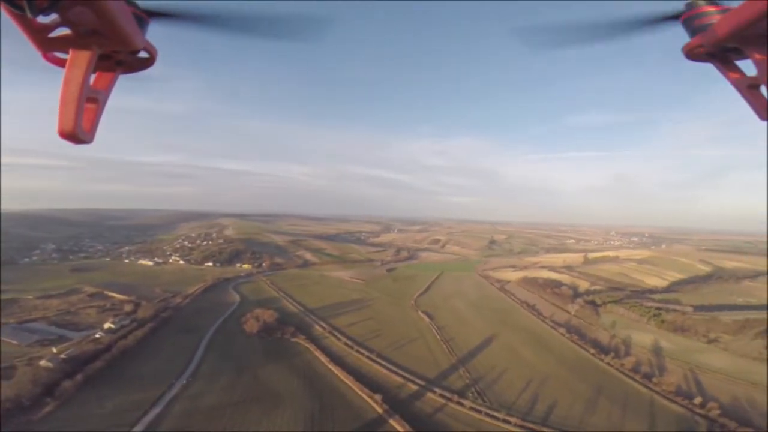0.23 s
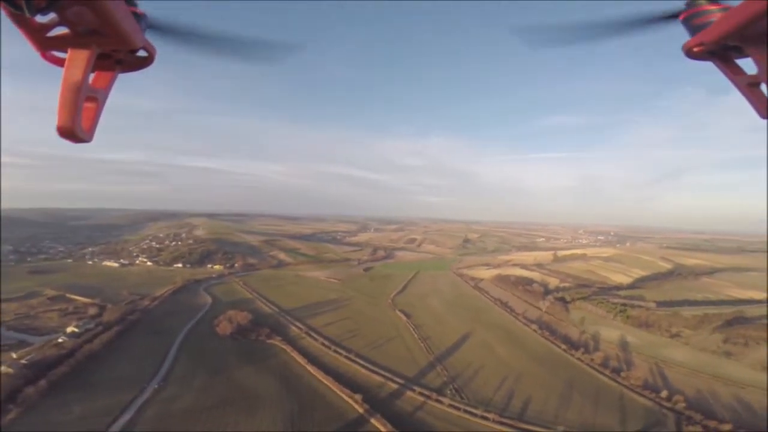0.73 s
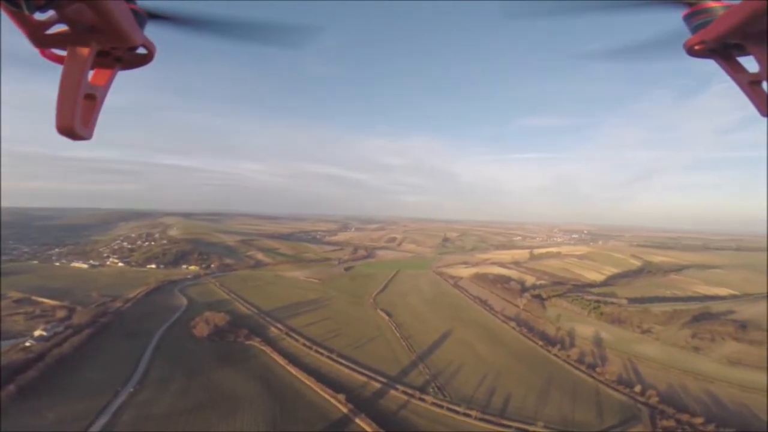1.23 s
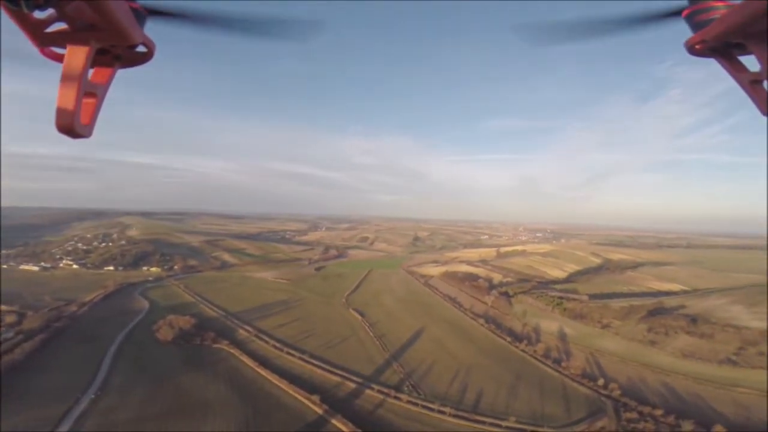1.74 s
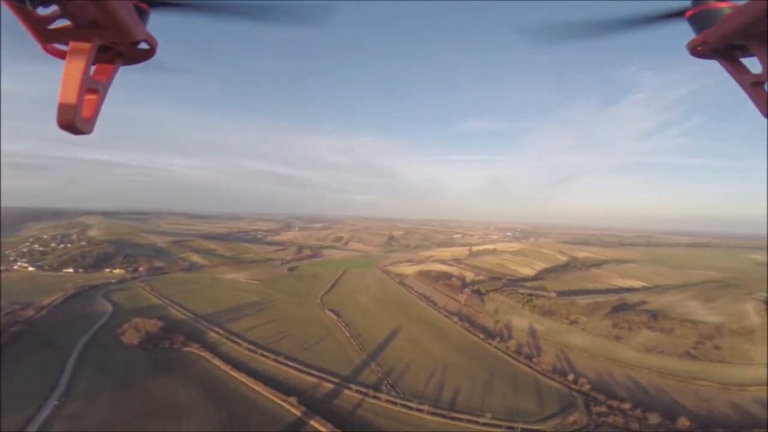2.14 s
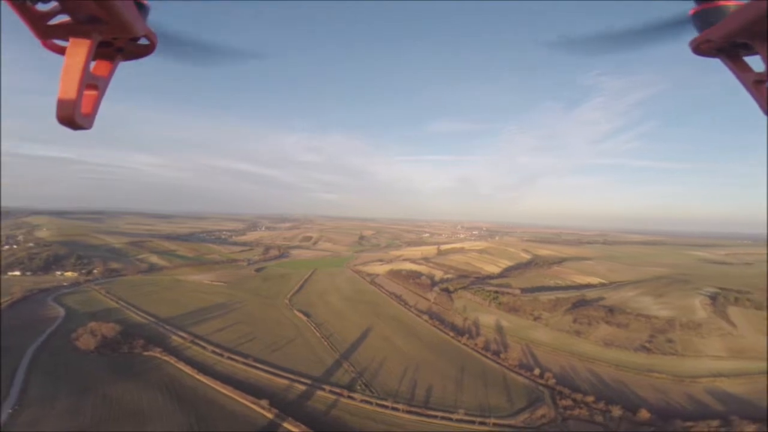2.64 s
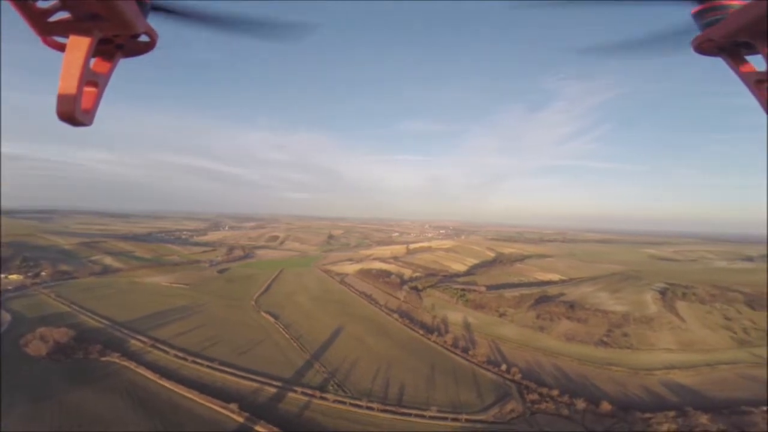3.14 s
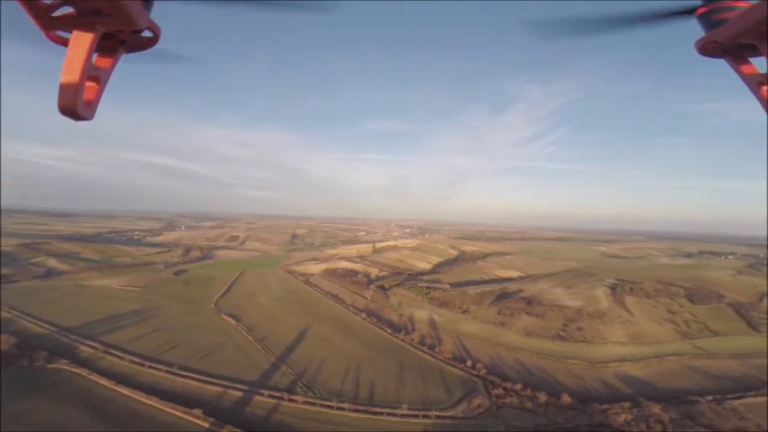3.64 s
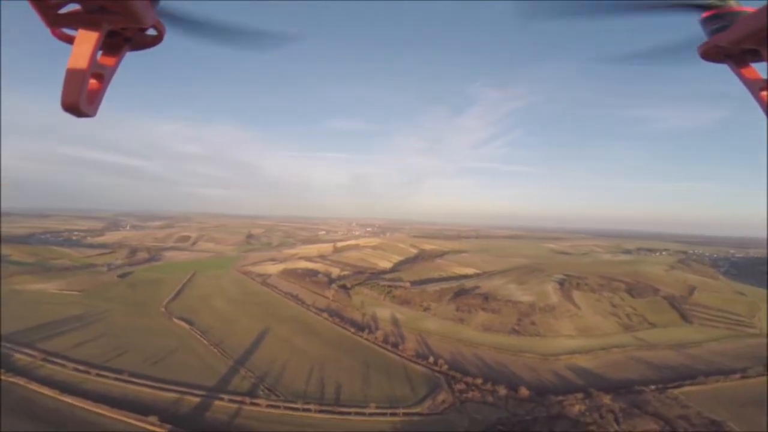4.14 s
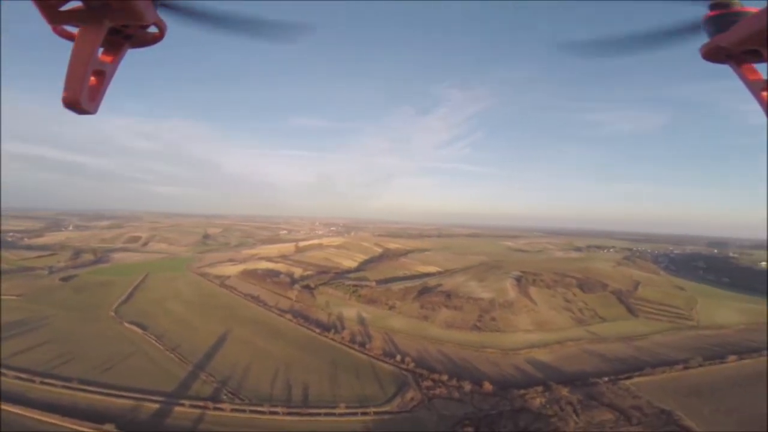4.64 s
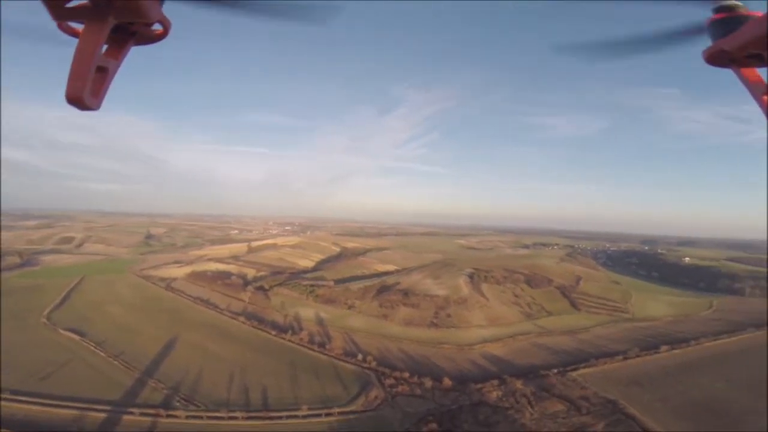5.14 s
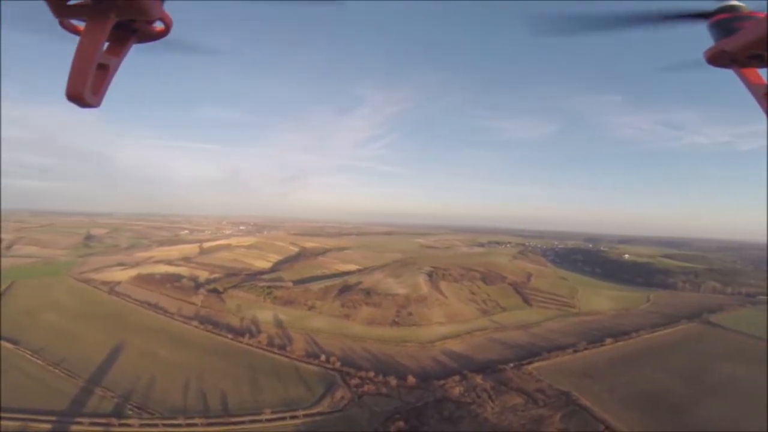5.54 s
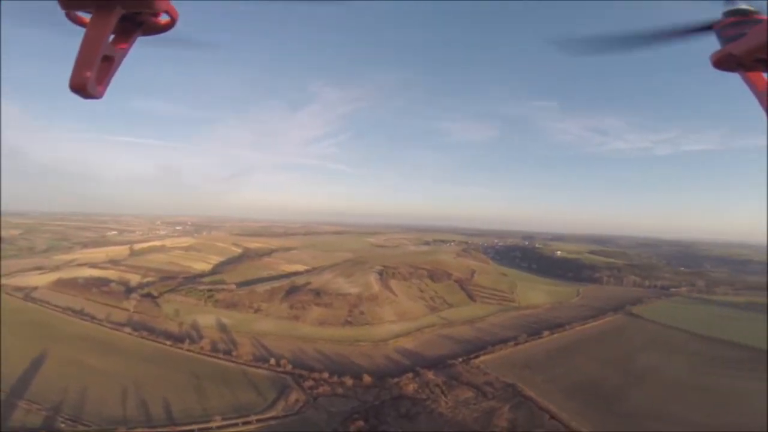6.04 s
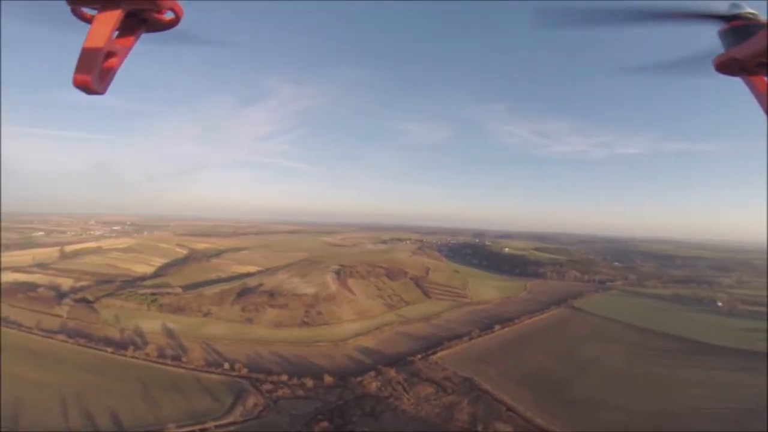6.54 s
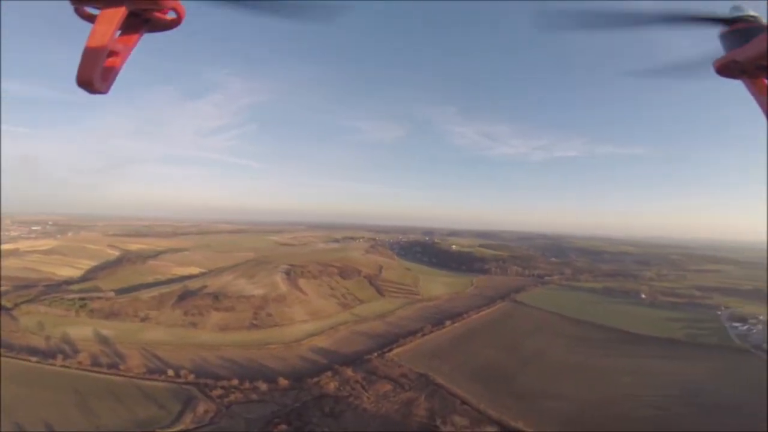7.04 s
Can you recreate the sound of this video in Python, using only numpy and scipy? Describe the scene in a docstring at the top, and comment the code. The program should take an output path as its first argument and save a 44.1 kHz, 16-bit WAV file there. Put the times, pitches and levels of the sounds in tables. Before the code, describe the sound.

Outdoors in the air, a drone buzzes continuously, very close and dry. Its deep propeller hum wavers as motor speeds shift, with metallic whines and a shrill, slowly beating electronic whistle overhead. Low gusts buffet the microphone early, strongest before three seconds. Afterwards a coarse, ragged chopping of air grows, peaks shortly before six seconds, then softens slightly.

```python
"""A six-rotor drone in flight, heard by a microphone on its frame: the two nearest propellers sound harmonics of
their blade-pass rates, which beat together, and their brushless motors add pole tones and switching sidebands.
Six speed controllers whistle as sines near 8 kHz, two of them about 2 Hz apart and beating; a farther motor
whines thinly. Both propellers chop turbulent air, made as random snaps at the passing blades; shaped noise gives
wind rumble and flutter, and a hiss that throbs at the fast blade-pass rate. The level dips briefly now and then."""
import sys
import numpy as np
from scipy import signal
from scipy.fft import rfft, irfft, next_fast_len
from scipy.io import wavfile

SR = 44100
rng = np.random.default_rng(int(sys.argv[2]) if len(sys.argv) > 2 else 0)


def transcribe(u):
    """Save the signal u as a 16-bit wav file named by the first command-line argument.

    u: samples, shape (n,) or (channels, n), limited to [-1, 1]; the rate is SR.
    q: integer samples, one column per channel.
    """
    v = np.clip(np.atleast_2d(u).T, -1, 1)
    q = np.round(v * 32767).astype(np.int16)
    wavfile.write(sys.argv[1], SR, q)


N = 321048

# Speed controllers; the first two drive the fast and the slow rotor.
# Each row: switching rate in Hz, level in dB relative to the common whistle level.
SWITCHING = [(8020.05, -10), (8049.62, -3), (8063.5, -19), (8082.8, -9), (8093.34, -18)]


def from_db(db):
    """Amplitude ratio of a level: 20 dB for each factor of ten."""
    return 10 ** (np.asarray(db) / 20)


def rms_one(x):
    """Normalisation of the root mean square to 1."""
    return x / np.sqrt(np.mean(x ** 2) + 1e-20)


def in_time(rows):
    """Linear interpolation of each column of a curve table, sample by sample."""
    seconds, *columns = np.transpose(rows)
    return [np.interp(np.arange(N) / SR, seconds, column) for column in columns]


def drift(rate_hz):
    """Slow random fluctuation of rms 1: white noise through a two-pole low-pass at rate_hz."""
    step, settling = 20, 4000   # samples per slow value, slow values discarded
    pole = np.exp(-2 * np.pi * rate_hz * step / SR)
    noise = rng.standard_normal(N // step + settling + 2)
    slow = signal.lfilter([1], [1, -2 * pole, pole * pole], noise)[settling:]
    return np.interp(np.arange(N) / step, np.arange(len(slow)), rms_one(slow))


def coloured(x, spectrum):
    """Spectral shaping: x filtered by a curve of dB against log frequency, then set to rms 1."""
    hz, db = np.transpose(spectrum)
    size = next_fast_len(N)
    log_hz = np.log(np.arange(1, size // 2 + 2) * SR / size)
    gain = from_db(np.interp(log_hz, np.log(hz), db, left=-60, right=-90))
    return rms_one(irfft(rfft(x, size) * gain, size)[:N])


def tone(angle, db):
    """A sine whose rms level is db: its peak is the square root of 2 times its rms."""
    return np.sqrt(2) * from_db(db) * np.sin(angle)


def shaft(turns, wobble):
    """Rotation: the angle is the integral of speed, here with the controller's small corrections (turns per s)."""
    turns = turns + wobble * drift(16.0)
    return turns, 2 * np.pi * np.cumsum(turns) / SR


def rotor(turns, angle, blade_db, octave_db, whine_db, orders, sidebands, switch_hz, arm):
    """Periodic blade loading gives shaft harmonics; switching mixed with the turning magnets gives sidebands."""
    blade_pass = tone(2 * angle, blade_db + 0.21 * drift(13.0))   # two blades
    out = blade_pass + tone(4 * angle, octave_db + 0.34 * drift(18.0))
    load_db = .5 * (octave_db - np.mean(octave_db))   # blade overtones grow with blade load
    arm_hz, width_hz, lift_db = arm
    switching = 2 * np.pi * switch_hz * np.arange(N) / SR
    waver_db = [0.93 * drift(2.3) for _ in range(4)]
    tones = [(0, k, db) for k, db in orders] + sidebands
    for i, (m, k, db) in enumerate(tones):
        # The arm resonance lifts tones that cross it.
        detuning = (m * switch_hz + k * turns - arm_hz) / width_hz
        arm_gain_db = lift_db / (1 + detuning ** 2)
        drive_db = load_db if m == 0 and k <= 16 else whine_db
        level_db = db + arm_gain_db + waver_db[i % 4] + drive_db
        out += tone(m * (switching + i) + k * angle, level_db)
    return out


def controllers():
    """Beating: of six whistles between 8020 and 8094 Hz, the closest two, about 2 Hz apart, beat slowly."""
    # Each row: time in seconds, common whistle level in dB.
    whistle = [(0, -25), (1.2, -25.5), (2.5, -24.5), (5, -27), (6.2, -27.5), (7.28, -28)]
    # A third controller's clock stays just below the slow rotor's, so that the two beat.
    # Each row: time in seconds, distance below in Hz.
    creep = [(0, 1.84), (1.2, 1.78), (2.5, 1.64), (3.5, 1.72), (4, 2.04), (5, 2.06), (5.8, 2.33),
             (6.6, 2.08), (7.28, 2.12)]
    creep_share_db = -4.5
    in_step_s = .45   # the beating pair is about in step here
    level_db, = in_time(whistle)
    below_hz, = in_time(creep)
    t = np.arange(N) / SR - in_step_s
    lag = np.cumsum(below_hz) / SR - below_hz[0] * in_step_s
    cycles = [hz * t for hz, _ in SWITCHING] + [SWITCHING[1][0] * t - lag]
    shares_db = [db for _, db in SWITCHING] + [creep_share_db]
    return sum(tone(2 * np.pi * c, db + level_db + .8 * drift(5.0)) for c, db in zip(cycles, shares_db))


def far_motor():
    """Frequency modulation: the pole tone of a farther motor hunts restlessly in pitch."""
    # Each row: time in seconds, mean pitch in Hz, mean level in dB.
    hunting = [(0, 4320, -62), (.65, 4260, -46), (.95, 4200, -53), (1.06, 4320, -49), (1.14, 4235, -47),
               (1.29, 4230, -50), (1.42, 4200, -54), (1.6, 4270, -56), (1.7, 4305, -48), (1.86, 4250, -46),
               (2.1, 4310, -46), (2.4, 4300, -51), (2.9, 4200, -50), (3.3, 4200, -62), (7.28, 4200, -72)]
    hz, db = in_time(hunting)
    angle = 2 * np.pi * np.cumsum(hz + 7.8 * drift(19.0)) / SR
    return tone(angle, db + 2.3 * drift(8.0))


def eddies(turns):
    """Blade-turbulence interaction: blades meet random snaps, partly repeated at later passes as an eddy lasts."""
    # Eddies drift along the blades' path, which shifts their meeting from pass to pass.
    # Each row: time in seconds, turns per second added to the meeting rate (negative is later).
    eddy_lead = [(0, .3), (3, -.3), (5.4, .4), (6, 3), (7.28, 2.8)]
    # Each row: frequency in Hz, relative density in dB per Hz.
    chop_colour = [(520, 3.5), (880, -8), (1450, -1), (2450, -2), (3900, -7), (6400, -10.5), (9800, -16.5),
                   (15400, -34)]
    lead, = in_time(eddy_lead)
    jitter = .014 * drift(60.0)   # blade passes
    passes, met = 2 * np.cumsum([turns, turns + lead], axis=1) / SR + jitter
    steps = 180   # places along one blade pass
    shape = (int(met[-1]) + 2, steps)   # one row per blade pass
    strength = from_db(1.9 * np.minimum(rng.exponential(1, shape), 4))
    sizes = strength * np.where(rng.random(shape) < .75, -1, 1)
    fresh = sizes * (rng.random(shape) < .3)
    lasting = signal.lfilter([1], [1, -.74], fresh, axis=0)   # each pass keeps 74 % of the one before
    snaps = np.interp(met * steps, np.arange(lasting.size), lasting.ravel())
    sweep = np.exp(0.76 * (np.cos(2 * np.pi * passes) - 1))   # swells once per blade pass
    return coloured(snaps * sweep * from_db(1.9 * drift(75.0)), chop_colour)


def chop(fast, slow):
    """Incoherent power sum: the two rotors share the energy of the turbulence they cut."""
    # Each row: time in seconds, level of the cut turbulence in dB.
    chop_level = [(0, -49), (1.2, -43), (2.5, -35.5), (2.9, -29), (3.15, -27.5), (3.25, -32), (3.38, -28),
                  (3.55, -36), (3.9, -29), (4.2, -30), (4.29, -27.5), (4.44, -31), (4.65, -29),
                  (4.92, -28.5), (5.05, -25.5), (5.4, -27), (5.62, -24), (5.82, -24.5), (5.94, -24),
                  (6.1, -24.5), (6.6, -27.5), (7.28, -29)]
    # Each row: time in seconds, share of the power cut by the slow rotor (0-1).
    slow_share = [(0, 0.26), (5.4, 0.29), (5.9, 0.25), (7.28, .6)]
    level_db, = in_time(chop_level)
    share = np.clip(*in_time(slow_share), 0, 1)
    cut = np.sqrt(1 - share) * eddies(fast) + np.sqrt(share) * eddies(slow)
    return from_db(level_db) * cut


def wind():
    """Turbulent pressure on the microphone port: low rumble and brighter flutter, swelling in gusts."""
    # Wind between gusts. Each row: time in seconds, mean rumble level in dB, mean flutter level in dB.
    steady_wind = [(0, -22, -27.5), (.8, -20, -22), (1.5, -23.5, -23.5), (2.2, -24.5, -29), (2.8, -25, -30),
                   (3.2, -27.5, -34), (4.6, -30, -34.5), (5, -39, -38), (5.9, -36.5, -36), (6.6, -33, -32),
                   (7.28, -30.5, -32)]
    # Each row: time of the peak in seconds, rumble added in dB, flutter added in dB.
    gusts = [(.12, -29, -46), (.36, -23, -46), (.5, -30, -28), (.79, -23, -47), (.95, -30, -31),
             (1.78, -23, -40), (2, -28, -36), (2.35, -18, -22), (2.53, -22, -26), (2.64, -19, -29),
             (2.8, -18, -42), (2.9, -21, -38), (3.04, -34, -50), (3.15, -28, -47), (3.4, -34, -48),
             (3.65, -28, -50), (3.89, -25, -43), (4.08, -25, -34), (4.3, -27, -46), (4.44, -40, -46),
             (4.52, -27, -49), (5.6, -33, -49), (6.45, -37, -38), (6.7, -33, -44), (6.87, -32, -41),
             (7.18, -40, -66)]
    # Each row of both spectra: frequency in Hz, relative density in dB per Hz.
    rumble_colour = [(16, 1), (42, 0), (72, 0.5), (115, -2), (185, -8.5), (310, -30), (600, -64)]
    flutter_colour = [(105, -12.5), (185, 0), (310, -5), (510, -10), (780, -20.5), (1500, -39), (2500, -46)]
    gust_s = 0.026   # from the peak to 1/e of it
    t = np.arange(N) / SR
    rumble_gain, flutter_gain = from_db(in_time(steady_wind) + 1 * drift(10))   # 1 dB random swell
    for s, rumble_db, flutter_db in gusts:
        bump = np.exp(-((t - s) / gust_s) ** 2)
        rumble_gain = rumble_gain + from_db(rumble_db) * bump
        flutter_gain = flutter_gain + from_db(flutter_db) * bump
    rumble = coloured(rng.standard_normal(N), rumble_colour) * rumble_gain * from_db(2.0 * drift(60.0))
    flutter = coloured(rng.standard_normal(N), flutter_colour) * flutter_gain * from_db(2.2 * drift(38.0))
    return rumble + flutter


def hiss(angle):
    """Amplitude modulation: broadband noise of air leaving the blade tips throbs at the fast blade-pass rate."""
    # Each row: frequency in Hz, relative density in dB per Hz.
    hiss_colour = [(520, 5), (920, -3), (1450, -7), (2550, -7), (3720, -13.5), (4080, -4), (5100, -6.5),
                   (5700, -8), (7600, -9.5), (10100, -6.5), (10900, -12.5), (12200, -13.5), (13000, -16),
                   (15400, -19.5)]
    mean_db = -34.5   # before the throb
    air = coloured(rng.standard_normal(N), hiss_colour)
    throb = 1 + .3 * np.cos(2 * angle)
    return air * throb * from_db(mean_db + .5 * drift(12.0))


def dips():
    """Exponential relaxation: the overall gain shifts fast, mostly downwards, and returns slowly."""
    # Each row: start in seconds, nominal depth in dB (negative is a rise).
    dip_table = [(.17, -0.6), (.39, 0.6), (.96, 2), (1.23, 1.1), (2.68, 1.6), (5.72, 2), (6.0, 1.2),
                 (6.31, -0.3), (6.75, 0.5)]
    fall_s, recover_s = 0.005, 0.35   # time constants
    depth_db = 0
    for s, db in dip_table:
        after = np.maximum(np.arange(N) / SR - s, 0)
        depth_db = depth_db + db * (np.exp(-after / recover_s) - np.exp(-after / fall_s))
    return from_db(-depth_db)


def scene():
    """Linear superposition: the pressures of all sources add at one microphone."""
    # Each row of both: time in seconds, mean speed in turns per second.
    fast_speed = [(0, 118.2), (.25, 118.3), (.4, 117.9), (.7, 117.7), (1.1, 120.1), (1.3, 120),
                  (1.45, 120.9), (1.7, 119.9), (1.9, 120.2), (2.2, 119.5), (2.5, 119.4), (2.9, 120.7),
                  (3.5, 122.5), (3.65, 123.9), (3.8, 123.7), (4, 122.5), (4.15, 123.2), (4.45, 123),
                  (4.7, 123.6), (4.8, 123.3), (5.1, 124.4), (5.35, 123.5), (5.7, 120), (6, 118.6),
                  (6.6, 118.3), (6.9, 117.8), (7.28, 116.4)]
    slow_speed = [(0, 95.2), (.15, 95.8), (.45, 95.9), (.56, 97), (.8, 97.4), (1.12, 97.4), (1.25, 95.8),
                  (1.39, 95.4), (1.5, 95.9), (1.67, 95.9), (1.78, 97.4), (1.88, 97.7), (1.97, 98.9),
                  (2.12, 99.7), (2.36, 98), (2.72, 97.9), (2.84, 96.8), (3.15, 97.7), (3.55, 96.9),
                  (3.75, 99), (3.92, 99.1), (4.1, 100.1), (4.45, 98.6), (4.7, 99.3), (5.12, 98.9),
                  (5.3, 101.2), (5.5, 101.6), (5.8, 104.1), (6.15, 105.6), (6.6, 103.9), (6.78, 102.5),
                  (6.9, 103.9), (7.15, 105), (7.28, 105.1)]
    # Each row of both: time in seconds, mean blade-pass level in dB, mean level of its octave in dB,
    # motor whine in dB relative to the order and sideband tables.
    fast_load = [(0, -17.5, -31.5, 1), (.4, -18, -33, -0.5), (.65, -17.5, -29.5, 0.5), (1.4, -16, -26, 2.5),
                 (3, -15, -25.5, .3), (3.8, -15.5, -22.5, .3), (5.1, -15, -23, 0), (5.6, -16, -24.5, -1),
                 (6.1, -16.3, -27, -3), (7.28, -17, -26, 1)]
    slow_load = [(0, -23.5, -35, 0), (.3, -20.5, -34, 1), (.8, -21, -34, 0.5), (1.1, -23.5, -33.5, 1),
                 (1.4, -20, -32.5, -1.5), (2.5, -19, -31.5, 1), (3.4, -19, -32.5, -1.5),
                 (4.1, -18.5, -32, -1), (5.3, -18.5, -32, 1), (5.8, -17.5, -32, -1), (6.2, -17.5, -32, 1.5),
                 (6.6, -18.5, -33.5, -1), (7.28, -17, -32, 1.5)]
    # Further tones locked to the shaft.
    # Each row of both: multiple of the turns per second, level in dB before load, waver and arm lift.
    fast_orders = [(6, -36), (8, -47), (10, -50), (12, -52), (14, -53), (16, -57), (42, -43.5), (48, -59),
                   (84, -52)]
    slow_orders = [(6, -45), (8, -49), (10, -50), (42, -45), (49, -56), (56, -53)]
    # Switching mixed with the turning magnets. Each row of both: multiple of the switching rate,
    # multiple of the turns per second added, level in dB before whine, waver and arm lift.
    fast_sidebands = [(1, -84, -52), (1, -42, -59), (1, -32, -51), (1, -28, -49), (1, -21, -59),
                      (1, -14, -50), (1, -2, -57), (1, 2, -55), (1, 4, -59), (1, 6, -55), (1, 8, -56),
                      (1, 10, -58), (1, 11, -57), (1, 13, -55), (1, 14, -50), (1, 15, -62), (1, 16, -62),
                      (1, 21, -65), (2, -84, -55), (2, -42, -67), (2, -16, -71)]
    slow_sidebands = [(1, -42, -51), (1, -28, -49), (1, -21, -54), (1, -14, -50), (1, 6, -59), (1, 8, -54),
                      (1, 10, -60), (1, 14, -54), (1, 21, -54), (1, 42, -64)]
    # Arm resonances. Each holds: centre in Hz, half width in Hz, peak lift in dB.
    fast_arm = (4545, 55, 15)
    slow_arm = (5092, 45, 14)
    fast_hz, slow_hz = SWITCHING[0][0], SWITCHING[1][0]
    fast, fast_angle = shaft(*in_time(fast_speed), wobble=.22)
    slow, slow_angle = shaft(*in_time(slow_speed), wobble=.15)
    out = rotor(fast, fast_angle, *in_time(fast_load), fast_orders, fast_sidebands, fast_hz, fast_arm)
    out += rotor(slow, slow_angle, *in_time(slow_load), slow_orders, slow_sidebands, slow_hz, slow_arm)
    out += controllers() + far_motor()
    out += chop(fast, slow) + wind() + hiss(fast_angle)
    return out[None]


def record(dry):
    """Band limiting: the gain dips now and then, and a steep elliptic low-pass removes the top."""
    cutoff_hz = 15300
    low_pass = signal.ellip(12, .5, 80, cutoff_hz, fs=SR, output="sos")   # 0.5 dB ripple, 80 dB stop
    return signal.sosfilt(low_pass, dry * dips())


dry = scene()
out = record(dry)
transcribe(out)
```